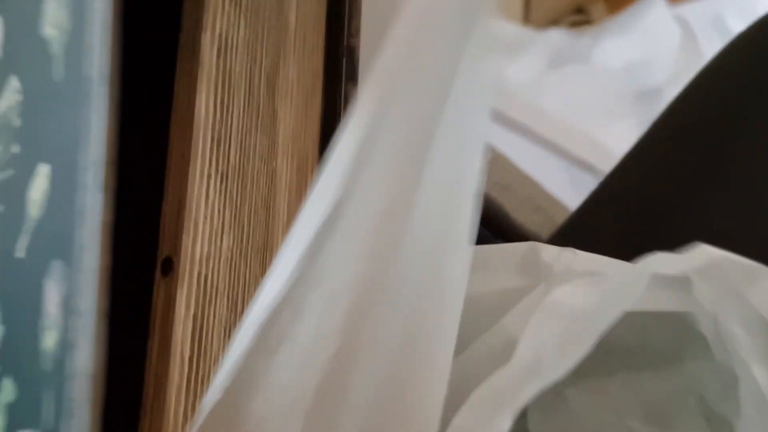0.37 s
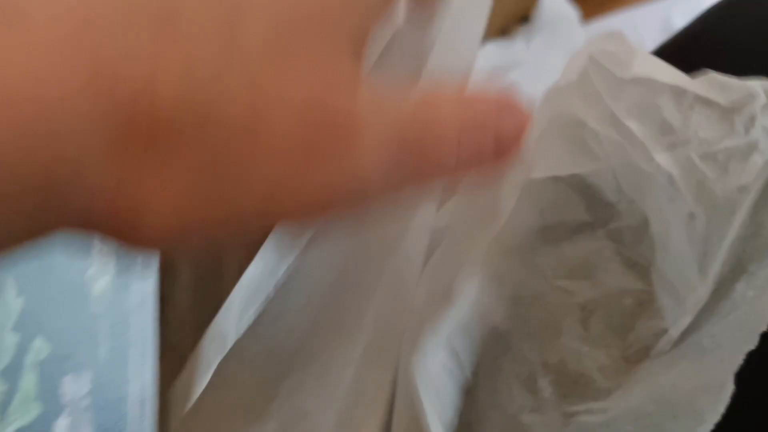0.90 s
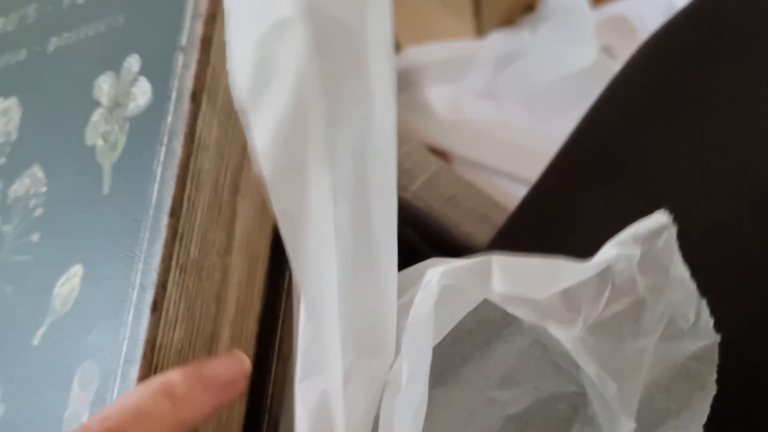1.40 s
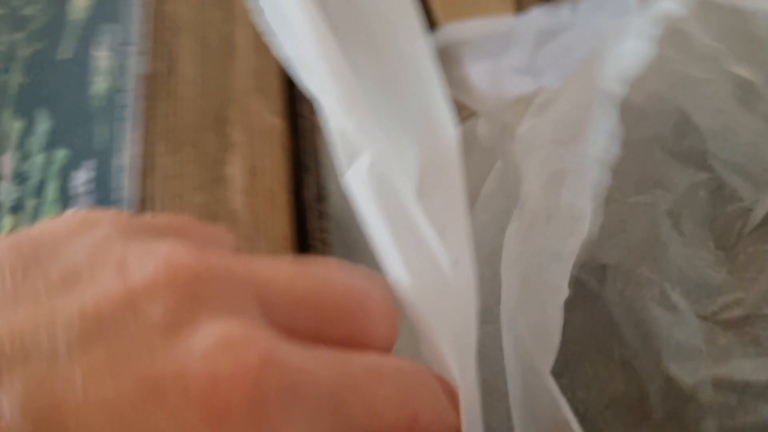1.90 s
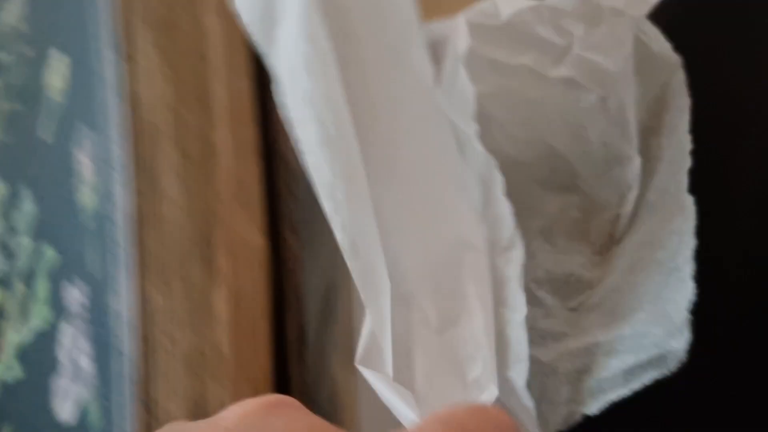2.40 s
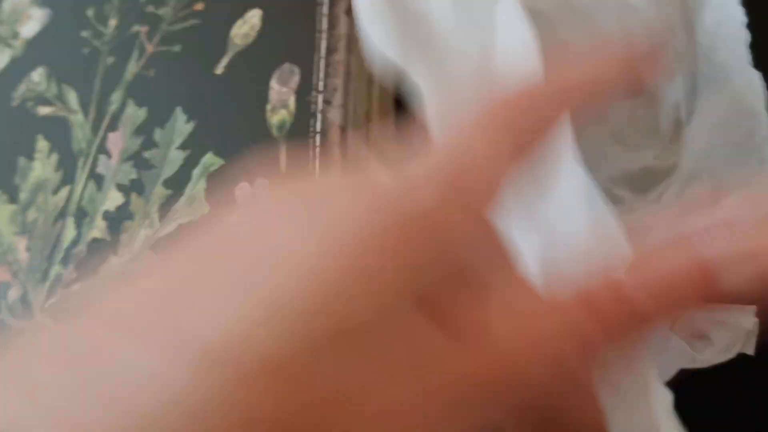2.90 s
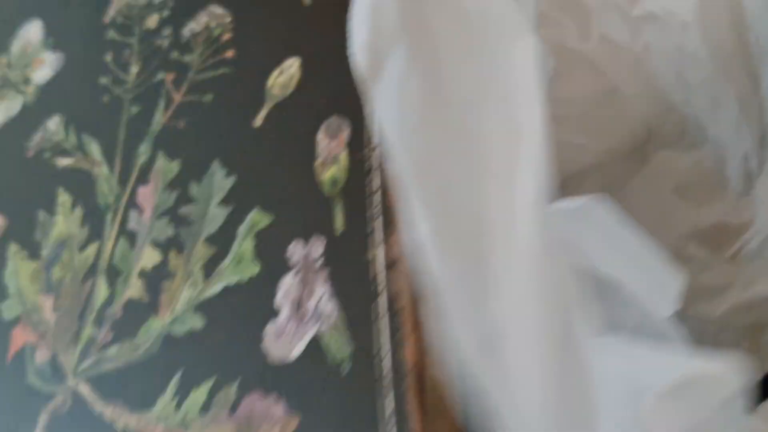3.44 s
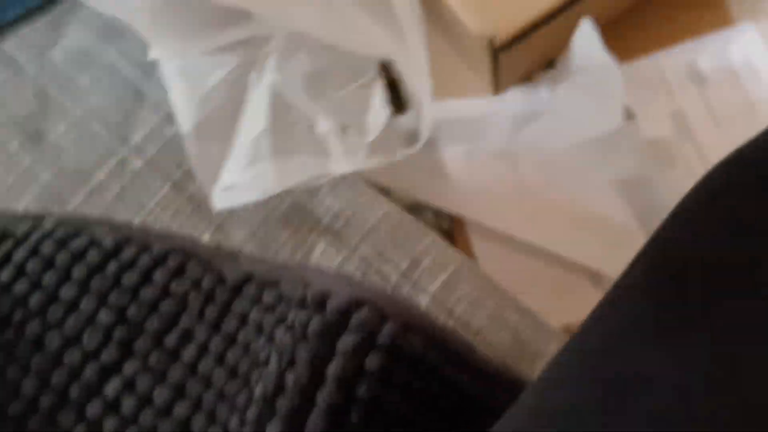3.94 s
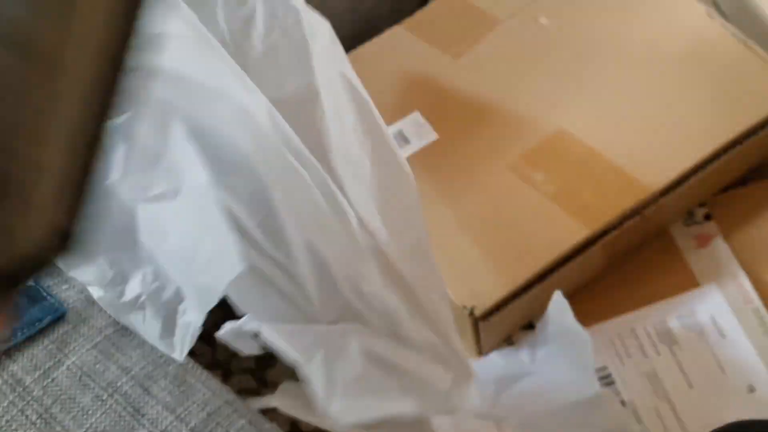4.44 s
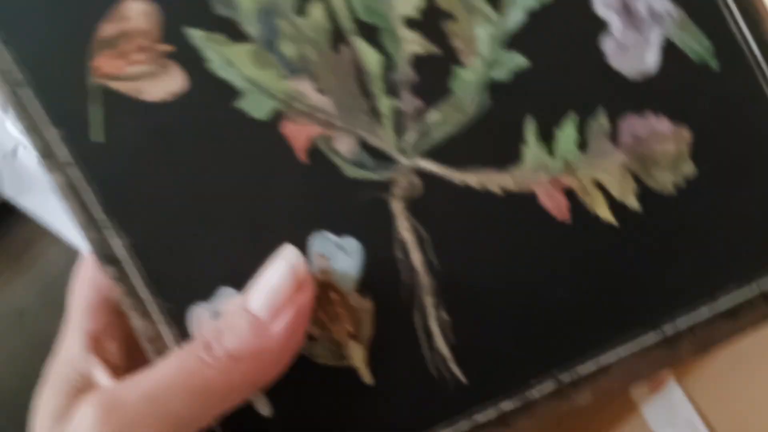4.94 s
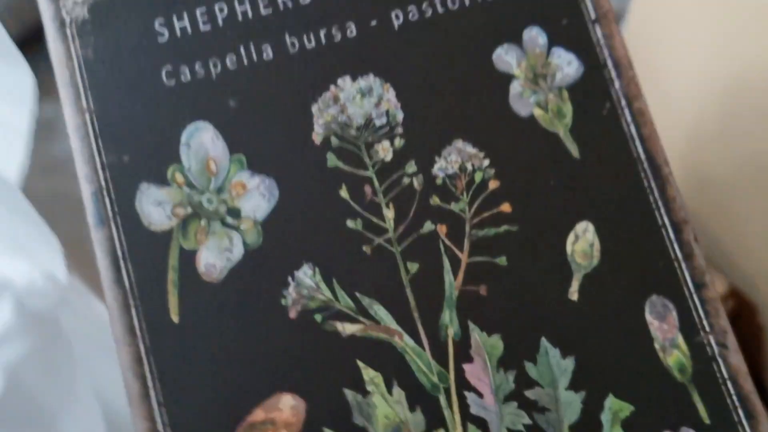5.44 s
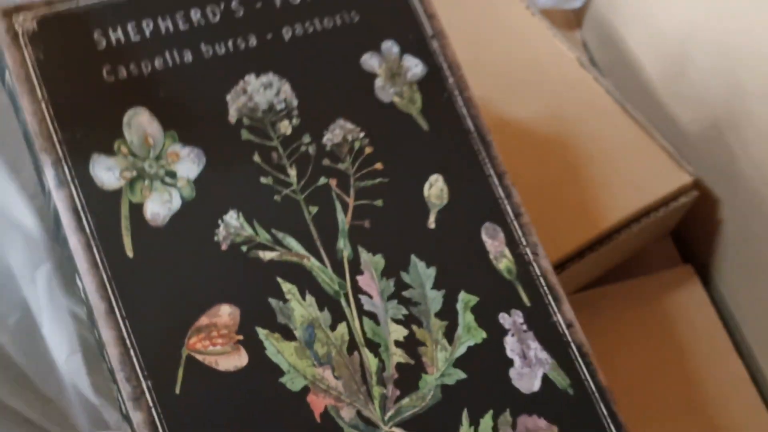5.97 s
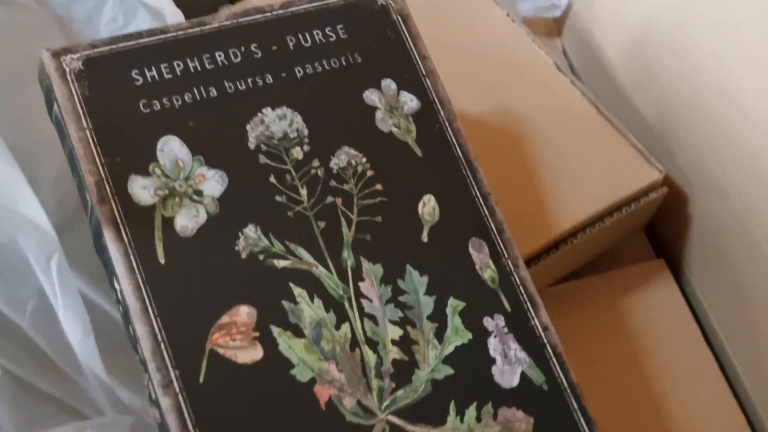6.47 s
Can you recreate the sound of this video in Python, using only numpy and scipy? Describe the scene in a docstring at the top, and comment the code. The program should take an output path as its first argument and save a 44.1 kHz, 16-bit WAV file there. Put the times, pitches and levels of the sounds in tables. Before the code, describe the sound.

Hands strip thin paper off a box right beside a small stereo microphone. Dense, crisp crinkling surges and dips, with a strong burst near the start and soft low thuds from the box. After three seconds it thins to a few dull crinkles, then nearly silent handling with tiny crackles, and a small soft rustle near the end. Dry furnished room, faint air noise and low hum.

```python
"""Tissue paper and wooden box

Hands pull thin tissue paper off a wooden box close to a phone, then turn the box over a carton in a quiet room.
The sheet buckles in thousands of tiny creases, each a dying noise burst; big folds snap with a longer one.
The slack sheet flaps as low noise, and knuckles excite the decaying modes of the hollow box.
The two microphone ports hear each crease a little apart in time; faint room noise and hum lie beneath."""
import sys
import numpy as np
from scipy import signal
from scipy.fft import rfft, irfft, next_fast_len
from scipy.io import wavfile
from scipy.ndimage import map_coordinates

SR = 44100
rng = np.random.default_rng(int(sys.argv[2]) if len(sys.argv) > 2 else 0)


def volts(x):
    """Linear amplitude factor 10**(x/20) for a level x in dB, scalar or array-like."""
    e = np.asarray(x, float) / 20
    return 10 ** e


def bounce(signal):
    """Save signal as a 16-bit WAV file at the path given by the first command-line argument."""
    frames = np.transpose(np.atleast_2d(signal))
    limited = np.clip(frames, -1, 1)
    pcm = np.round(limited * 32767).astype(np.int16)
    wavfile.write(sys.argv[1], SR, pcm)


N = 290619  # samples
TIME = np.arange(N) / SR  # s


def unit(x):
    """Normalisation: the signal divided by its root mean square."""
    return x / np.sqrt(np.mean(x ** 2) + 1e-20)


def along(points, hz):
    """Logarithmic frequency scale: (f/Hz, value) points joined by straight lines on it."""
    f, value = np.transpose(points)
    return np.interp(np.log(hz + 1), np.log(f + 1), value)


def curves(rows, s):
    """Linear interpolation in time: each column after t/s, read at the times s."""
    t, *columns = np.transpose(rows)
    return [np.interp(s, t, column) for column in columns]


def wobble(rate, s):
    """Band-limited random fluctuation: a spline through rate random knots a second."""
    return map_coordinates(rng.standard_normal(size=4000), [s * rate])


def filtered(x, response):
    """Linear filtering: the spectrum of x multiplied by a response of frequency."""
    size = next_fast_len(N + SR // 2)
    hz = np.fft.rfftfreq(size, 1 / SR)
    return irfft(rfft(x, size) * response(hz), size)[..., :N]


def coloured(x, spectrum):
    """Spectral shaping at constant power: a flat sound of rms 1 keeps rms 1."""
    grid_hz = np.linspace(0, SR / 2, num=4096)
    scale = np.sqrt(np.mean(volts(along(spectrum, grid_hz)) ** 2))
    return filtered(x, lambda hz: volts(along(spectrum, hz)) / scale)


def rush(spectrum, alike):
    """Partial coherence: mid and side noise are weighted to set the ports' correlation; rms 1."""
    def mid_side_response(hz):
        turn = np.arccos(np.clip(along(alike, hz), -1, 1)) / 2
        return volts(along(spectrum, hz)) * [np.cos(turn), np.sin(turn)]

    mid, side = filtered(rng.standard_normal((2, N)), mid_side_response)
    return unit(np.array([mid + side, mid - side]))


def swells(s, start, hold, db, rise, fall):
    """Addition of powers: events that rise, hold and fall at fixed rates in dB/s."""
    power = np.zeros(len(s))
    for a, h, level in zip(start, hold, db):
        below_db = rise * (a - s).clip(0) + fall * (s - a - abs(h)).clip(0)
        power += volts(2 * (level - below_db))
    return power


# where the hands work: t/s, lead of the left port/ms, left-right level/dB
HAND_PLACES = [(0, 0.17, 1.5), (1, 0.16, -1), (2.2, 0.11, -1.5), (2.8, 0.076, -4.5), (3.2, 0.23, -1.5),
               (4.2, 0.31, 1.5), (4.7, 0.09, -3), (5.3, 0.094, -5), (5.7, 0.3, 1.5), (6.59, 0.25, -2.5)]


def bursts(s, gain, hz, width_hz, t60, pan_db, spread_ms, size, ring=0):
    """Impulsive radiation: resonant noise bursts of norm gain decay, delayed between the ports."""
    f, t = np.fft.rfftfreq(size, 1 / SR), np.arange(size) / SR
    decay = volts(-60 * t / t60[:, None])
    resonance = 1.03 + 1.13 * np.exp(-((f - hz[:, None]) / width_hz) ** 2)
    burst = irfft(rfft(rng.standard_normal((len(s), size))) * resonance, size) * decay
    # an optional tone at the resonance, sized by the burst
    tone = np.sin(2 * np.pi * hz[:, None] * t) * decay
    burst += ring * np.linalg.norm(burst, axis=1)[:, None] * tone
    burst *= (gain / np.linalg.norm(burst, axis=1))[:, None]
    lead = (curves(HAND_PLACES, s)[0] + spread_ms * rng.standard_normal(len(s))) / 1000
    out = []
    for side in (1, -1):  # left, right
        first = np.round((s - side * lead / 2) * SR).astype(int)
        at = np.clip(first, 0, N)[:, None] + np.arange(size)
        panned = burst * volts(side * pan_db / 2)[:, None]
        out.append(np.bincount(at.ravel(), panned.ravel(), N + size + 1)[:N])
    return np.array(out)


def paper():
    """Superposition of the sheet's sounds: crackle and snaps, the body they drive, and flapping."""
    crackle_db = pull_level()
    folds, slide, snap = creases(count=16000), sliding(), snaps()
    return crackle(crackle_db, folds, slide, snap) + body(crackle_db, folds, slide, snap) + flap()


# changing pull of the hands on the sheet: t/s, crackle level/dB
PULL_LEVELS = [(0, -32.5), (.1, -27), (.4, -25.5), (.59, -31), (.68, -27), (.84, -42.5), (.96, -46),
               (1.09, -35.5), (1.22, -38.5), (1.34, -25.5), (1.512, -34.5), (1.56, -27), (2.12, -26.5),
               (2.27, -36), (2.4, -25.5), (2.56, -25), (2.64, -32), (2.93, -33), (3.07, -45.5), (3.21, -74),
               (3.3, -41), (3.45, -49.5), (3.59, -42.5), (3.75, -41), (3.86, -48.5), (4.2, -57.5),
               (4.3, -55.5), (4.53, -56.5), (4.68, -61), (4.85, -52.5), (5.0, -58), (5.12, -70.5),
               (5.7, -78.5), (5.73, -62.5), (5.87, -48.5), (5.99, -49), (6.24, -62), (6.59, -66.5)]
# short tugs on top of the pull: t/s, hold/s, crackle level/dB
SHORT_TUGS = [(0.428, 0.03, -14.5), (0.507, 0.013, -19.5), (.617, 0.022, -29), (0.702, 0.016, -21),
              (0.879, .004, -34.5), (0.982, .004, -35), (1.023, 0.023, -27), (1.159, 0.0086, -34.5),
              (1.348, 0.12, -25), (1.566, .004, -30), (2.42, .008, -25.5), (2.66, 0.11, -27.5),
              (2.873, .008, -29.5), (2.975, 0.0063, -30), (3.113, 0.0036, -40), (3.165, .004, -43.5),
              (3.234, 0.0037, -35.5), (3.342, .004, -47), (3.482, .004, -42), (3.638, 0.037, -38),
              (3.911, .004, -42.5), (4.122, .004, -68), (4.214, .004, -71), (4.708, .004, -48.5),
              (4.802, .008, -44), (5.246, 0.0051, -62.5), (5.805, .004, -53.5), (6.001, 0.091, -45),
              (6.333, 0.012, -57), (6.48, .004, -71), (6.537, .004, -58.5)]


def pull_level():
    """Addition of powers: the slower rise and fall of the pull plus short tugs, as a level in dB."""
    tugs = swells(TIME, *np.transpose(SHORT_TUGS), rise=699, fall=298)
    return 10 * np.log10(volts(2 * curves(PULL_LEVELS, TIME)[0]) + tugs)


def creases(count):
    """Buckling: small creases give way at random moments, in clumps of varied size; rms 1."""
    u = rng.random((count, 5))
    s = u[:, 0] * N / SR
    size_db = -2.5 * np.log(1 - u[:, 1]).clip(-2.5) + 1.8 * wobble(40, s) + 2.1 * wobble(150, s)
    pan_db = curves(HAND_PLACES, s)[1] + 6 * (u[:, 4] - .5)
    # wide folds sound dull, tight ones bright
    wide = u[:, 2] < curves(SHEET_SLACK, s)[1]
    hz = np.where(wide, 3100, 6600) * (1 + 0.034 * wobble(25, s))
    t60 = 0.0055 + 0.0055 * u[:, 3]
    return unit(bursts(s, volts(size_db), hz, 760, t60, pan_db, spread_ms=0.054, size=192))


def sliding():
    """Friction noise: paper sliding on paper fills the gaps between creases, weaker in the treble."""
    return filtered(rng.standard_normal((2, N)), lambda hz: 1 / (1 + (hz / 9000) ** 2))


# big folds giving way: t/s, burst level before 7 dB is added/dB, resonance f/Hz
FOLD_SNAPS = [(.105, -5.5, 5350), (.176, -12, 6540), (.2785, -12, 3000), (.417, -3, 6500),
              (.4239, -10, 4930), (0.493, -6, 6450), (0.5237, -5, 5630), (0.876, -21, 5650),
              (0.9705, -19, 4890), (1.2334, -21, 5010), (1.476, -9, 6570), (1.5184, -12, 6400),
              (1.5776, -27, 6300), (1.825, -10.5, 6160), (1.9939, -11, 4100), (2.0714, -15, 6140),
              (2.1086, -8, 6000), (2.1894, -13, 7000), (2.3503, -13, 6670), (3.04, -22, 2930),
              (3.13, -25.5, 3100), (3.199, -35, 3770), (3.22, -25, 3700), (3.2316, -15, 3740),
              (3.29, -27, 3860), (3.331, -35, 6700), (3.3818, -26.5, 7380), (3.485, -35, 6800),
              (3.5996, -13.5, 2870), (3.6157, -14, 2900), (3.6265, -14.5, 2800), (3.6624, -31, 6170),
              (3.685, -19, 2900), (3.903, -37, 3420), (4.0128, -25.5, 4200), (4.1204, -33.5, 3400),
              (4.1424, -34.5, 4160), (4.172, -32, 7200), (4.2033, -36, 6700), (4.2187, -28.5, 5070),
              (4.2567, -31, 3900), (4.459, -40, 3560), (4.553, -36, 6000), (4.608, -27, 5550),
              (4.6937, -37, 6860), (4.7783, -36, 5370), (5.099, -47, 3450), (5.241, -38.5, 7230),
              (5.36, -43, 3410), (5.715, -40.5, 3300), (5.7368, -33.5, 3700), (5.7694, -32.5, 3700),
              (5.8004, -28, 7650), (5.8671, -31, 5920), (5.9308, -26.5, 6900), (5.998, -24.5, 6600),
              (6.0582, -26.5, 2750), (6.0804, -26, 3780), (6.1002, -24.5, 6900), (6.2264, -37, 3770),
              (6.2965, -28, 2820), (6.312, -32, 3640), (6.3855, -36, 3700), (6.475, -40.5, 5860),
              (6.497, -38, 5500), (6.531, -32, 3200)]


def snaps():
    """Sudden energy release: each big fold gives a broad noise burst with a faint ring."""
    s, level_db, hz = np.transpose(FOLD_SNAPS)
    # offset from the hands, and scatter, both left-right dB
    pan_db = curves(HAND_PLACES, s)[1] - 3 + 3 * rng.standard_normal(len(s))
    t60 = np.full(len(s), .014)
    return bursts(s, volts(level_db + 7), hz, 1400, t60, pan_db, spread_ms=0.066, size=1024, ring=0.11)


# spectrum of the crackle: f/Hz, relative level per Hz/dB
CRACKLE_SPECTRUM = [(880, -35.5), (1500, -18.5), (1710, -16), (2380, -2), (4520, -1.5), (6300, -0.5),
                    (7250, 0), (8420, -7.5), (10800, -8), (12600, -3.5), (15100, -1), (16000, -18.5),
                    (16500, -99)]


def crackle(crackle_db, folds, slide, snap):
    """Amplitude modulation: the pull scales creases and sliding; snaps join under one spectrum."""
    fine = unit(folds + 0.92 * slide)
    return coloured(volts(crackle_db) * fine + snap, CRACKLE_SPECTRUM)


# spectrum of the sheet's body: f/Hz, relative level per Hz/dB
BODY_SPECTRUM = [(180, -28.5), (300, -5.5), (580, 5), (902, 0), (1190, 1.5), (1700, -4), (2040, 0.5),
                 (2200, -8.5), (2860, -110.5), (4840, -120)]


def body(crackle_db, folds, slide, snap):
    """Forced vibration: creases, sliding, buckling panels and snaps drive the sheet's lower range."""
    # -39 dB at a crackle of -27 dB, 0.9 dB per dB of crackle, plus the fullness
    body_db = -39 + 0.9 * (crackle_db + 27) + curves(SHEET_SLACK, TIME)[2]
    drive = folds + 0.5 * slide + 0.27 * buckles(count=500)
    return coloured(volts(body_db) * drive + .2 * snap, BODY_SPECTRUM)


def buckles(count):
    """Snap-through: whole panels of the sheet pop over with a short low burst; rms 1."""
    u = rng.random((count, 3))
    s = u[:, 0] * N / SR
    size_db = -3 * np.log(1 - u[:, 1]).clip(-3)
    hz, t60 = 400 + 900 * u[:, 2], np.full(count, .03)
    return unit(bursts(s, volts(size_db), hz, 190, t60, 0 * s, spread_ms=0.04, size=1024))


# slack of the sheet: t/s, flap level/dB, share of wide folds (0-1), fullness of the body level/dB
SHEET_SLACK = [(0, -58, 0.68, -1), (.45, -48, 0.37, 1.5), (.7, -47, 0.12, -2), (.85, -55, 1, -1),
               (1.2, -55, 0.24, -3.5), (1.4, -45, 0.36, -0.5), (1.8, -50.5, .3, 0), (2.07, -51, 0.5, 0),
               (2.3, -62, 0.23, 1.5), (2.65, -47.5, 0.23, 0), (3.1, -59.5, 0.88, 3), (3.7, -57, .45, 2.5),
               (4.3, -66, 0.4, -0.5), (5.05, -70.5, 0.25, -2), (5.7, -67, .3, 4), (6.02, -64, 0.37, 3),
               (6.59, -67.5, 1, 7.5)]
# spectrum of the flapping: f/Hz, relative level per Hz/dB
FLAP_SPECTRUM = [(15, -56.5), (25, -41), (70, -2.5), (113, -7.5), (231, -0.5), (341, 1), (450, -10),
                 (580, -27), (990, -120)]


def flap():
    """Low-frequency membrane motion: fluctuating noise that also swells around each knock."""
    knock_s, knock_db, *_ = np.transpose(BOX_KNOCKS)
    # 22.5 dB under the knock; 60 dB of rise takes 0.08 s, 60 dB of fall 0.23 s
    jolts = swells(TIME, knock_s, 0 * knock_s, knock_db - 22.5, 60 / .08, 60 / 0.23)
    strength = np.sqrt(volts(2 * curves(SHEET_SLACK, TIME)[0]) + jolts)
    return strength * volts(2.5 * wobble(9.5, TIME)) * rush(FLAP_SPECTRUM, [(60, 0.55), (400, 0.84)])


# knocks on the box: t/s, level of the strongest mode before its soft onset/dB, favoured f/Hz, t60 there/s
BOX_KNOCKS = [(0.453, -20, 500, 0.038), (0.499, -14, 70.4, 0.057), (0.592, -14.5, 294, 0.056),
              (0.728, -27, 101, 0.055), (1.38, -31, 90.5, 0.061), (1.622, -32.5, 452, 0.099),
              (1.806, -23, 468, 0.027), (2.096, -20, 310, 0.022), (2.118, -32, 130, 0.073),
              (2.387, -23.5, 500, 0.027), (2.464, -12, 287, 0.084), (3.242, -23.5, 195, 0.076),
              (3.369, -32, 280, 0.041), (4.165, -37.5, 1000, 0.033), (4.171, -43, 296, 0.034),
              (4.502, -44, 360, 0.028), (4.569, -39.5, 1400, 0.0087), (4.57, -44.5, 300, 0.037),
              (4.872, -46, 265, 0.13), (6.002, -46, 790, 0.022), (6.002, -39.5, 1400, 0.06),
              (6.07, -42, 1020, 0.04)]
# modes of the hollow box: f/Hz, relative level/dB
BOX_MODES = [(75, -1.5), (130, -3.5), (190, -2), (269, 3), (450, 6), (720, 4), (1000, 6.5), (1150, 2.5),
             (1550, 3.5), (1900, -12)]


def box():
    """Modal excitation: each knock rings the box's modes, favouring those near the struck panel's pitch."""
    out, t = np.zeros(N + SR), np.arange(SR // 4) / SR
    mode_hz, mode_db = np.transpose(BOX_MODES)
    for s, db, favoured_hz, t60 in BOX_KNOCKS:
        levels = mode_db - 13 * abs(np.log2(mode_hz / favoured_hz))  # 13 dB per octave away
        ring = np.zeros(len(t))
        for hz, level in zip(mode_hz, levels - levels.max()):
            # higher modes die sooner
            fade_db = 60 * t / t60 * (hz / favoured_hz) ** 0.33
            ring += volts(level - fade_db) * np.sin(2 * np.pi * hz * t)
        # a soft blow builds up over about a cycle
        onset = 1 - np.exp(-(t * favoured_hz / 0.5) ** 2)
        out[round(s * SR):][:len(t)] += volts(db) * ring * onset
    return out[:N] * volts([[1.5], [-1.5]])  # left, right


# reverberation time of the room: f/Hz, t60/s
ROOM_DECAY = [(200, 0.042), (2000, 0.091), (10000, 0.018)]


def room(x):
    """Diffuse reverberation: a delayed noise tail answers, each frequency dying at its own speed."""
    hz, t, z = signal.stft(rng.standard_normal((2, SR // 2)), SR, nperseg=256)
    decay = volts(-60 * t / along(ROOM_DECAY, hz)[:, None])
    tail = signal.istft(z * decay, SR, nperseg=256)[1]
    delayed = np.pad(x, ((0, 0), (200, 0)))  # samples
    return signal.fftconvolve(delayed, tail / np.linalg.norm(tail[0]), axes=1)[:, :N]


# noise of the quiet room, with a band of hum: f/Hz, relative level per Hz/dB
AIR_SPECTRUM = [(25, -19.5), (100, -15), (140, -18.5), (175, -11), (218, 0.5), (270, -15.5), (310, -12),
                (560, -14), (750, -9.5), (1200, -16), (1800, -19), (3500, -14.5), (7000, -29),
                (8400, -46.5), (15100, -50.5), (16500, -48)]
# likeness of the room noise at the ports: f/Hz, left-right correlation (-1 to 1)
AIR_LIKENESS = [(60, 0.27), (240, 0.58), (950, 0.19), (3770, -0.39), (15000, 0.16)]


def air():
    """Stationary background noise: a steady, partly coherent rush at -64.5 dB."""
    return volts(-64.5) * rush(AIR_SPECTRUM, AIR_LIKENESS)


# narrow hum in the room: f/Hz, relative level per Hz/dB
HUM_SPECTRUM = [(170, -62), (192, -11), (202, 0.5), (214, -15), (245, -61.5)]


def hum():
    """Narrow-band noise: a low hum near 200 Hz, largely common to both ports, at -71 dB."""
    return volts(-71) * rush(HUM_SPECTRUM, [(200, .8)])


def scene():
    """Direct and reverberant fields: paper and box up close, in a small furnished room."""
    near = paper() + box()
    walls = volts(-14) * room(near)
    return near + walls + air() + hum()


def low_pass(x):
    """Removes everything above the highest recorded frequency."""
    return signal.sosfilt(signal.butter(12, 17080, fs=SR, output="sos"), x)


# colour of the ports: f/Hz, left-right level/dB
PORT_COLOUR = [(60, -3), (130, 1.5), (290, -2.5), (640, 2.5), (1410, 4.5), (3100, -4), (6820, -0.5),
               (15000, 4)]
# phase of the ports: f/Hz, lead of the left port/rad
PORT_PHASE = [(200, 0), (400, -0.14), (600, 1.34), (900, 1.39), (1400, 0.47), (1800, 0.54), (2500, 0.052),
              (4000, 0.24)]


def record(dry):
    """Transfer functions of the two ports: they differ in colour and phase."""
    half = np.array([[.5], [-.5]])  # left, right

    def port_response(hz):
        return volts(along(PORT_COLOUR, hz) * half) * np.exp(1j * along(PORT_PHASE, hz) * half)

    return low_pass(filtered(dry, port_response))


dry = scene()
out = record(dry)
bounce(out)
```